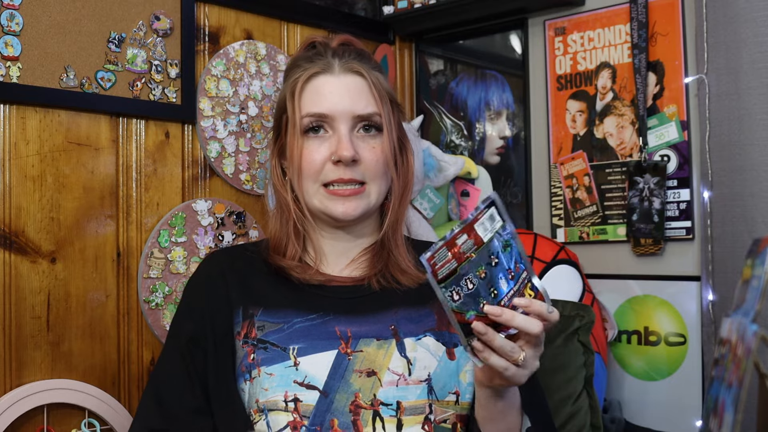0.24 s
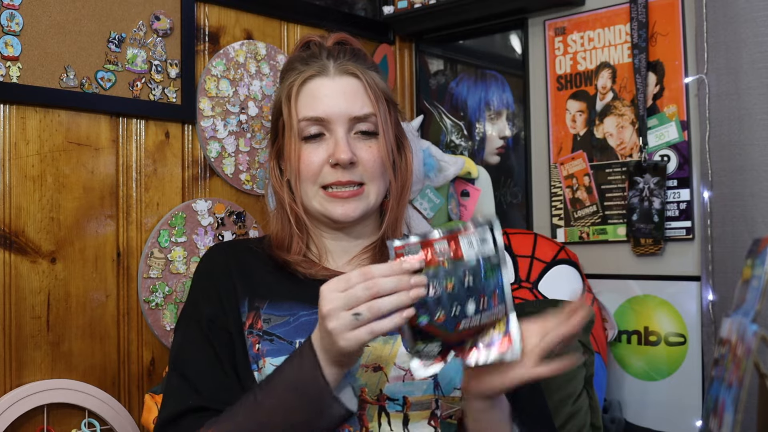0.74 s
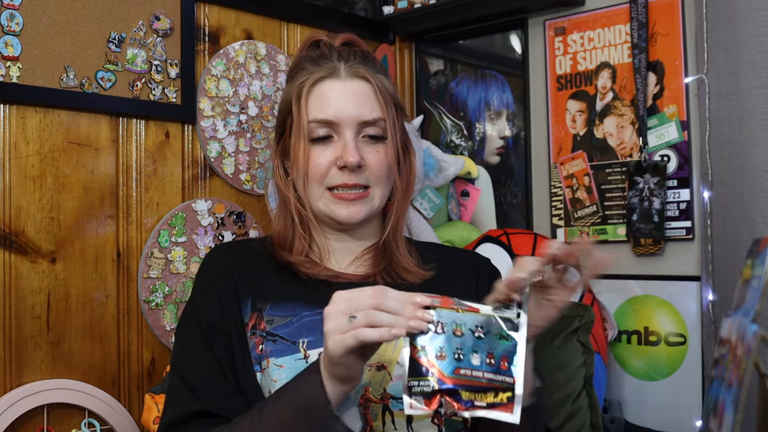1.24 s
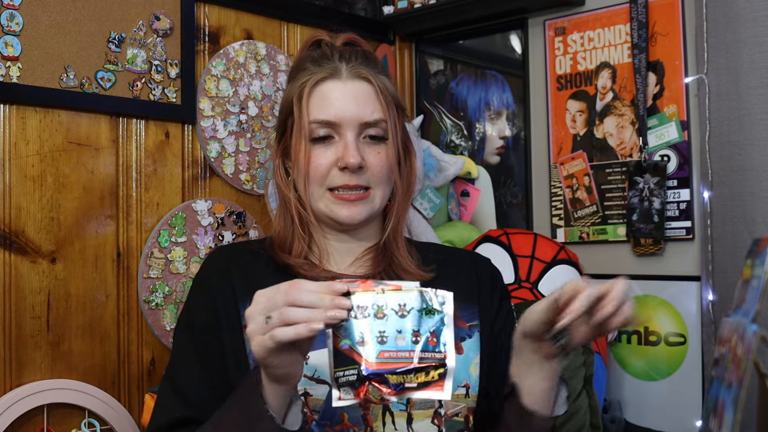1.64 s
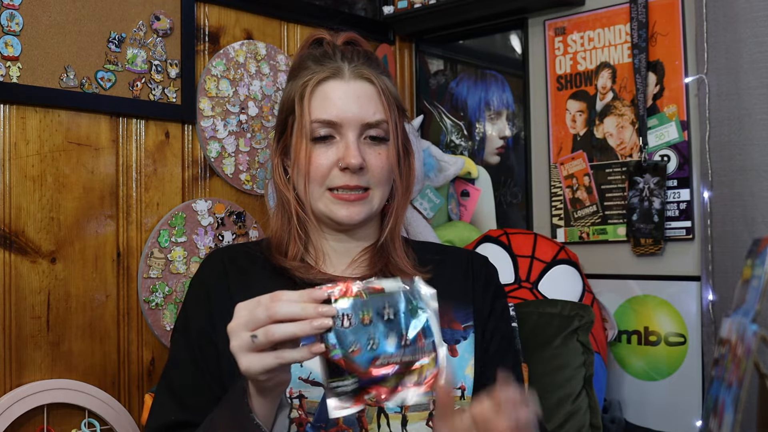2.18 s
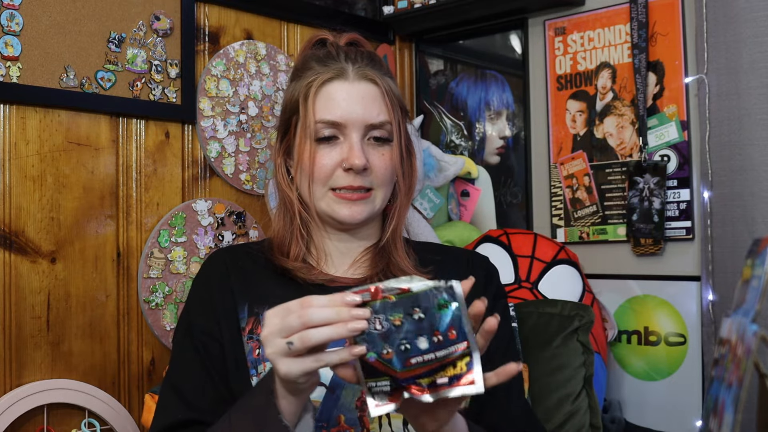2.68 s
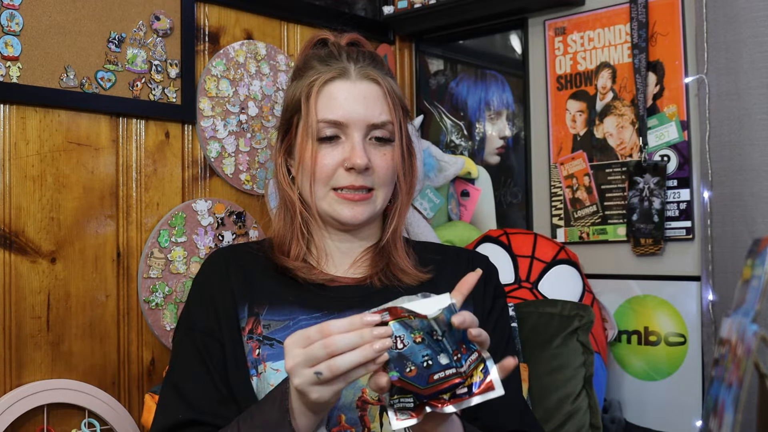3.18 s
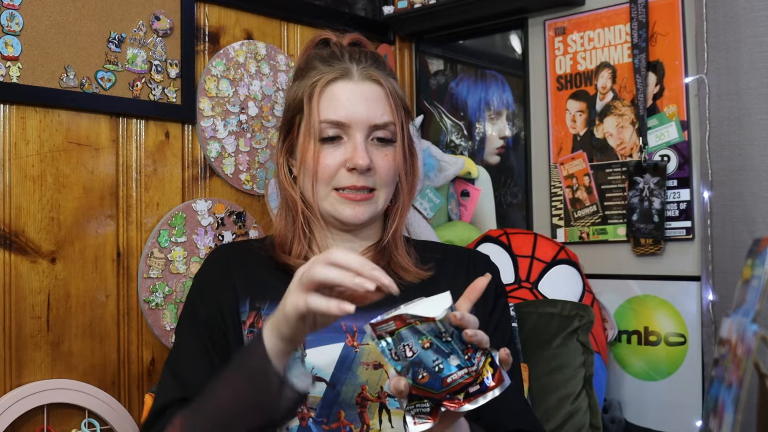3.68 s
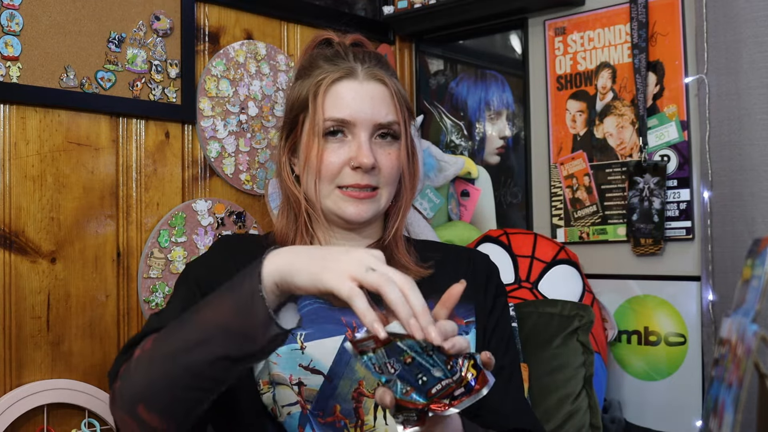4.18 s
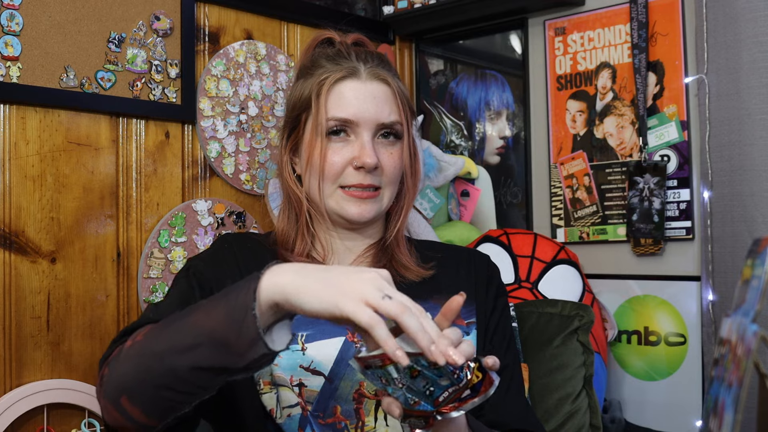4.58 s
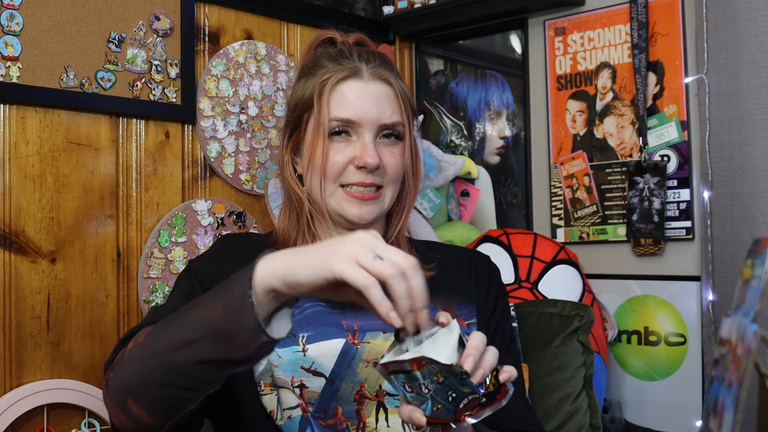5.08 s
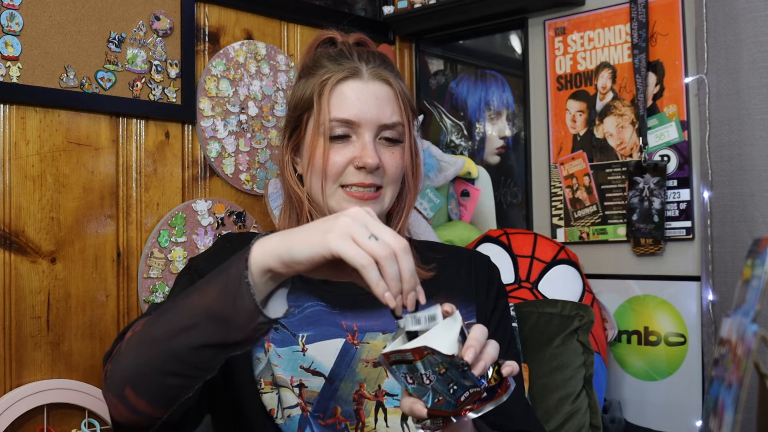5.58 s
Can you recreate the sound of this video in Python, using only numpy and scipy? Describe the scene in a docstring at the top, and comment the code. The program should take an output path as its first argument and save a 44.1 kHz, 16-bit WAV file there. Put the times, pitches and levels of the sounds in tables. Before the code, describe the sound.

A hard object rattles and knocks on a desk, then a stiff foil packet crackles in irregular bursts as fingers pull at it.

```python
"""A small room with a faint hum; a stiff foil packet is turned over and pulled open by hand, close to
the microphone. First something hard rattles to rest and knocks on the desk: modes driven by blows,
with a clatter of dying noise. Then the foil buckles in single snaps and bunches of snaps, short noise
bursts that ring a facet. Squeezes of the fingers bring lesser snaps and a fine crinkling of many tiny
creases; slides are grainy filtered noise, squeaks short rising whistles."""
import sys
import numpy as np
from scipy import signal
from scipy.fft import rfft, irfft
from scipy.io import wavfile

SR = 44100
rng = np.random.default_rng(int(sys.argv[2]) if len(sys.argv) > 2 else 0)


def unload_audio(sound):
    """Save the sound as a 16-bit wav file, at the path given as the first command line argument."""
    columns = np.transpose(np.atleast_2d(sound))
    # keep every value between -1 and 1, then stretch to whole-number steps
    steps = np.round(np.clip(columns, -1, 1) * 32767)
    wavfile.write(sys.argv[1], SR, steps.astype(np.int16))


N = 257103

# Levels in the tables are relative: the functions add their own gains.
# Steady colour of the room tone: (frequency [Hz], spectral level [dB])
ROOM_TONE_COLOUR = [(15, -7), (35, -3), (75, -1), (115, -7), (170, 0.5), (260, -5), (450, -7), (900, -13),
                    (1700, -15), (2500, -21.5), (5000, -22), (9000, -24), (16000, -25.5)]
# Echoes from near surfaces: (delay [s], level [dB])
NEAR_ECHOES = [(.0037, -24), (.0043, -15), (.0052, -17.5), (.0061, -23.5), (.0074, -16.5), (.0089, -17.5),
               (0.011, -30), (0.0278, -20.5)]
# Decay of the small room: (frequency [Hz], t60 [s])
ROOM_T60 = [(200, 0.082), (550, 0.16), (1400, 0.11), (3700, 0.15), (9000, .15), (15000, 0.056)]
# Colour of its reverberation: (frequency [Hz], level [dB])
ROOM_COLOUR = [(200, 3.5), (600, 6), (1500, -1.5), (4000, 0), (8500, 0), (12000, 1), (16000, -2.5)]
# Slow after-ring of the room, colour: (frequency [Hz], level [dB])
LINGER_COLOUR = [(100, -27), (200, 1.5), (450, -5), (750, -10), (1100, -12), (1600, -17), (2500, -22),
                 (6000, -12), (16000, -40)]
# Slow after-ring of the room, decay: (frequency [Hz], t60 [s])
LINGER_T60 = [(200, 0.25), (700, 1), (1600, 1), (4000, 0.4)]

# Modes of the hard object that rattles: (frequency [Hz], level [dB], t60 [s])
OBJECT_MODES = [(214, -3.5, 0.11), (901, -2.5, 0.21), (971, -1, 0.35), (1420, -10, 0.27), (1574, -29, 0.17),
                (1700, -20, .22), (1898, -8, 0.19), (2320, -24, 0.076), (2620, -8, 0.15), (2810, 1, 0.085),
                (3150, -7, 0.088), (3920, -10, 0.079), (4840, -7, 0.072)]
# Modes of the desk: (frequency [Hz], level [dB], t60 [s])
DESK_MODES = [(224, 0.5, 0.27), (252, 0, 0.11), (355.4, -2, 0.29), (404, -3.5, 0.26), (465, -4, 0.46),
              (516, 3.5, 0.12), (675, -1, 0.36), (708, -13, 0.15), (872, 1.5, 0.053), (1270, -27, 0.08),
              (1980, -4, 0.07)]
# Colour of a hard blow: (frequency [Hz], level [dB])
BLOW_COLOUR = [(25, -29), (80, -13), (160, -35), (210, -3), (300, -9), (700, 2), (1200, 2.5), (2100, -5),
               (3200, -10), (5000, -16), (8500, -24.5), (11000, -37), (16000, -49)]
# Decay of a hard blow: (frequency [Hz], t60 [s])
BLOW_T60 = [(200, 0.33), (700, 0.13), (2000, 0.17), (5000, 0.12), (12000, 0.15)]
# Bounces of the object as it rattles to rest: (time [s])
BOUNCES = [.031, .0767, .098, .124, .144, .187]
FIRST_BOUNCE_DB, SETTLE_DB_PER_S = -19, 127  # level of the first bounce, and how fast they weaken
BOUNCE_TILT, BOUNCE_HZ = 1.4, 2900  # dB per octave; pitch of the struck spot
# Knocks on the desk:
# (time [s], level [dB], tilt [dB per octave], pitch of the struck spot [Hz], its boost [dB])
KNOCKS = [(.293, -14.5, 5, 4480, 8), (.349, -16.5, -3.5, 1110, 0), (.3617, -18.5, -1, 2120, 13),
          (.3733, -20.5, -8.5, 720, 9.5), (.418, -31.5, -11.5, 448, 5), (.6059, -22.5, -5, 2830, 6.5),
          (.616, -22, -4.5, 815, 7.5)]

# A fingertip slipping on the foil: (time [s], level [dB], pitch [Hz], length [s])
SQUEAKS = [(1.962, -35.5, 7680, 0.0085), (2.046, -42, 4400, .008), (2.049, -31, 2900, 0.0036),
           (4.56, -40, 6480, 0.012)]
# A finger sliding over the foil: (time [s], length [s], level [dB])
SLIDES = [(0.794, 0.029, -37), (2.511, 0.021, -31), (2.807, 0.028, -48), (3.009, 0.036, -36.5),
          (4.509, 0.031, -44.5), (5.114, 0.035, -32.5), (5.745, .07, -54)]
# Colour of a slide: (frequency [Hz], level [dB])
SLIDE_COLOUR = [(150, -27), (400, 0.5), (1800, 5), (3000, -1.5), (6500, -3.5), (8600, -4), (11000, -15),
                (16000, -20)]
# A squeeze or pull of the fingers: (time [s], length [s], level of the effort [dB])
SQUEEZES = [(0, 0.21, -50), (0.212, 0.18, -57), (0.75, 0.06, -55), (1.192, 0.26, -41), (1.408, .1, -29.5),
            (1.935, .17, -52.5), (2.318, 0.081, -35.5), (2.45, 0.094, -48), (2.793, 0.074, -52.5),
            (3, 0.17, -49.5), (3.184, .35, -40.5), (3.574, 0.22, -47.5), (4.0, 0.69, -58),
            (4.753, 0.092, -45), (4.89, 0.3, -48.5), (5.096, .12, -46), (5.296, .09, -63)]
GRIP_S, LET_GO_S = 0.0083, 0.024  # build-up and dying away of a squeeze
HOLDING_DB = -62  # effort while the foil is only held and stirs faintly
# Colour of the fine crinkling: (frequency [Hz], level [dB])
CRINKLE_COLOUR = [(100, -12), (220, -10), (450, 4), (900, -8), (1800, 6.5), (2700, -0.5), (4500, -2),
                  (6300, -5.5), (8600, -5.5), (11000, -15), (16000, -15)]

# Snaps that stand out: (time [s], level [dB], ring of the facet [Hz],
# sharpness [dB], dull pop below 0 and bright tick above, focus of the sound around the ring [dB])
SNAPS = [(.0028, -16.5, 1500, 1, -2.5), (0.2752, -32.5, 4570, -19, 10), (0.4339, -27, 1340, -24.5, -6),
         (0.4716, -31, 1480, -8, 1), (0.695, -36, 1770, 10, 4), (0.7626, -32, 1930, -14.5, -2),
         (0.8148, -24, 1650, -7.5, -2), (0.85, -30.5, 1670, -17, -8.5), (0.8732, -33, 9130, 4, 3),
         (.9986, -28.5, 1660, -3, -4.5), (1.118, -37.5, 2750, -16, 9), (1.174, -36, 1830, -6, 3),
         (1.194, -32.5, 4590, -5, -3), (1.223, -17, 2300, -2, 1.5), (1.233, -15, 7850, 6, 6),
         (1.2366, -15.5, 1850, 1, 3), (1.2427, -16.5, 1880, 3, 2), (1.3083, -29, 8200, -1, 5),
         (1.3222, -31, 1810, -7, -2), (1.3291, -27, 1940, -2, 1), (1.34, -25, 2960, 3, -5),
         (1.3552, -17, 1970, -7.5, -4), (1.3567, -11.5, 1910, 7, -1), (1.4116, -19.5, 1600, -2.5, -8.5),
         (1.429, -12.5, 8100, 21, 13), (1.444, -11, 5600, 4, -3.5), (1.4707, -11, 8600, 14, -2),
         (1.475, -13, 1820, -12, -2.5), (1.4912, -16.5, 1830, -2, 1), (1.4964, -11, 1890, 3, -3.5),
         (1.5074, -18.5, 1980, -2, -4), (1.516, -20.5, 2470, -1, 3), (1.5258, -21, 3560, 13, 0),
         (1.8094, -34.5, 4300, 5.5, 0), (1.8755, -38.5, 8200, -7, 3), (1.9468, -36, 2000, -17.5, 5.5),
         (1.9866, -29.5, 2180, -5, 1), (2.044, -35, 4420, 9, 0), (2.093, -37.5, 4500, 1, 0),
         (2.1488, -34, 5200, -2, -1), (2.213, -36.5, 8500, 1, 6), (2.3083, -21.5, 1822, -17, 5),
         (2.3131, -18, 1870, -6, -2), (2.3279, -22.5, 1770, 1, -4), (2.341, -20, 1800, -12, -1.5),
         (2.3623, -16.5, 4200, -2.5, 2), (2.3692, -18, 1760, -3, -1.5), (2.415, -24.5, 1700, -9, 3),
         (2.455, -25.5, 1810, -12.5, 1), (2.4784, -26.5, 2110, -13, 3), (2.5237, -14, 1480, -4.5, -1),
         (2.63, -18.5, 5100, 8.5, -0.5), (2.833, -39, 1850, -13, 6), (2.8565, -26, 3250, -1.5, -2),
         (2.879, -35, 7170, 1, 1), (2.91, -38.5, 1840, -8, 5), (2.9445, -36, 2810, -12.5, -1),
         (2.97, -32.5, 1760, -8, 4), (3.0899, -32, 7600, -8, 4.5), (3.1202, -35, 1930, -20, 0),
         (3.1642, -30.5, 1810, -12.5, 3), (3.175, -22.5, 2070, 10, 7), (3.1801, -12.5, 9400, 11.5, 1.5),
         (3.1819, -14.5, 9700, 6.5, 0), (3.1989, -20, 9200, 16, -6), (3.2137, -16.5, 8440, 11.5, -5),
         (3.2473, -20, 7300, 12, -1), (3.321, -15, 7300, 7, 1), (3.355, -15.5, 5040, 3.5, 5),
         (3.3993, -21, 1630, -6.5, 6), (3.4297, -15.5, 8190, 5, -1.5), (3.462, -17, 1940, 11, -1),
         (3.515, -15, 1904, 8, 3.5), (3.5263, -18.5, 4740, 0.5, 12.5), (3.615, -25, 5300, -3, 1.5),
         (3.6276, -28, 1820, 5, 11), (3.6651, -18, 5140, -1, 9), (3.704, -26, 2000, 0, 7),
         (3.7132, -16.5, 1557, 3.5, -3.5), (3.7553, -30.5, 1450, -14, 1), (3.7629, -19, 8140, 17.5, 1.5),
         (3.837, -25, 4870, 3, 0), (3.8463, -7.5, 1510, 5.5, 5), (3.856, -17.5, 1430, -11, 20),
         (3.9694, -34.5, 1760, -10, -2), (4.012, -36.5, 3870, -2.5, -2.5), (4.3392, -34, 1740, -5, -5),
         (4.3762, -17, 6120, 18, -2), (4.5551, -30.5, 8100, -6, 1.5), (4.601, -38.5, 1640, -3, 14),
         (4.6456, -36, 1760, 0, 0), (4.735, -25, 1970, -2, -3), (4.767, -32.5, 1640, -8, -9),
         (4.8056, -27.5, 1450, -4.5, -5.5), (4.8295, -34.5, 5460, 1.5, -2), (4.9664, -23, 1836, 9, 2),
         (4.9711, -19.5, 4200, 9.5, -1.5), (4.9989, -30, 1718, 4, -5), (5.1036, -13.5, 9200, -2.5, 1.5),
         (5.1668, -16.5, 1410, -3, 1.5), (5.204, -15.5, 1810, 0, 3), (5.2829, -24, 1640, -9, -0.5),
         (5.3135, -16, 4970, 0, 3), (5.37, -29.5, 4600, -3.5, 6), (5.43, -47, 1500, -19, -12)]
# Colour common to all snaps: (frequency [Hz], level [dB])
FOIL_COLOUR = [(60, -18.5), (150, -13), (210, -9.5), (370, 1.5), (640, -5.5), (950, -1), (1600, 3),
               (2000, 3), (2500, 1), (3300, 4.5), (4500, 4.5), (6300, 0), (8500, 5), (10800, -3),
               (13500, 2), (16000, -5.5)]
# Further colour of a snap at zero sharpness: (frequency [Hz], level [dB])
SNAP_COLOUR = [(550, 0), (1600, 4), (4000, -0.5), (7000, -1.5), (12500, -9.5)]
# How each band follows the sharpness: (frequency [Hz], change [dB per dB])
SHARPENING = [(550, -1.19), (1600, -0.33), (4000, -0.068), (7000, 0.19), (12500, 0.63)]
# Wide facets ring clearly, small ones less: (frequency [Hz], height of the ring [dB])
FACET_RING = [(1500, 11.5), (3000, 9), (5000, 9), (8500, 7.5)]


def amp(db):
    """Decibels to gain."""
    return 10 ** (np.asarray(db) / 20)


def unit(x):
    """Scales to an rms of one."""
    return x / np.sqrt(np.mean(x ** 2) + 1e-20)


def read(points, hz):
    """Reads a table along a log-frequency axis."""
    f, value = np.transpose(points)
    return np.interp(np.log(hz + 1), np.log(f + 1), value)


def add(mix, s, sound):
    """Mixes a sound in at time s, or at the start if s is negative."""
    part = mix[max(round(s * SR), 0):][:len(sound)]
    part += sound[:len(part)]


def bins(size):
    """Frequencies of a spectrum of that many samples."""
    return np.fft.rfftfreq(size, 1 / SR)


def pulse(db):
    """The shortest causal (minimum-phase) pulse that has this spectrum."""
    log_gain = np.log(amp(np.r_[db, db[-2:0:-1]]))
    return np.fft.ifft(np.exp(np.conj(signal.hilbert(log_gain)))).real


def dying(x, t60s):
    """Lets each band of x die at its own speed."""
    hz, t, z = signal.stft(x, SR, nperseg=128)
    decay = np.exp(-np.log(1000) * t / read(t60s, hz)[:, None])
    return signal.istft(z * decay, SR, nperseg=128)[1][:len(x)]


def even_noise(size):
    """Noise whose spectrum is flat: only the phases are random."""
    return unit(irfft(np.exp(2j * np.pi * rng.random(size // 2 + 1))))


def room_tone(air_db=-53.5, hum_hz=199, hum_width_hz=3, hum_db=-60):
    """Steady low noise, with a hum that wavers because it is a narrow band of noise."""
    hz = bins(N)
    air = irfft(rfft(rng.standard_normal(N)) * amp(read(ROOM_TONE_COLOUR, hz)), N)
    hum_band = 1 / (1 + ((hz - hum_hz) / hum_width_hz) ** 2)
    hum = irfft(rfft(rng.standard_normal(N)) * hum_band, N)
    return amp(air_db) * unit(air) + amp(hum_db) * unit(hum)


def tail(t60s, colour, size):
    """Diffuse reverberation: coloured noise with a decay for each band."""
    noise = dying(rng.standard_normal(size), t60s)
    return signal.fftconvolve(noise, pulse(read(colour, bins(size=1024))))[:size]


def linger(x, wet_db=-31, size=32768):
    """Things in the room ring on faintly after the loud sounds."""
    response = tail(LINGER_T60, LINGER_COLOUR, size)
    return amp(wet_db) * signal.oaconvolve(x, response / np.linalg.norm(response))[:N]


def room(ahead, around=None, wet_db=-4, near_db=3, near_s=0.0026, start_s=0.0022, sway=.04, size=6144):
    """Direct sound and echoes that shift as the hands move; what is sent all around feeds a short tail."""
    t = np.arange(size) / SR
    early_boost = 1 + amp(near_db) * np.exp(-t / near_s)
    fade_in = np.minimum(t / start_s, 1) ** 2
    diffuse = tail(ROOM_T60, ROOM_COLOUR, size) * early_boost * fade_in
    paths = signal.unit_impulse(size)  # the direct sound
    for delay, db in NEAR_ECHOES:
        add(paths, delay * (1 + sway * rng.uniform(-1, 1)), amp([db]))
    sent_around = ahead if around is None else around
    wet = signal.fftconvolve(sent_around, diffuse / np.linalg.norm(diffuse))
    return signal.fftconvolve(ahead, paths) + amp(wet_db) * wet


def ringing(modes, blows, rise_s=0.00071, size=65536):
    """Each blow (s, dB) tops up the energy of the modes, which die at their own speeds."""
    t, kicks, sound = np.arange(size) / SR, np.zeros(size), np.zeros(size)
    for s, db in blows:
        add(kicks, s, amp([db]) ** 2)
    contact = np.exp(-1 / (rise_s * SR))
    kicks = signal.lfilter([1 - contact], [1, -contact], kicks + 1e-20)
    for hz, db, t60 in modes:
        kept = np.exp(-2 * np.log(1000) / (t60 * SR))  # share of the energy left a sample later
        energy = signal.lfilter([1], [1, -kept], kicks)
        sound += amp(db) * np.sqrt(energy) * np.sin(2 * np.pi * (hz * t + rng.random()))
    return sound


def blow(db, tilt, spot_hz, spot_db, crack=1, crack_s=0.0017, spot_width=0.1, size=16384):
    """A hard contact: a crack and a dense clatter, boosted at the pitch of the struck spot."""
    t, hz = np.arange(size) / SR, bins(size=1024)
    clatter = dying(even_noise(size), BLOW_T60) * (1 + crack * np.exp(-t / crack_s))
    colour = read(BLOW_COLOUR, hz) + tilt * np.log2(np.maximum(hz, 500) / 1000)
    colour += spot_db / (1 + (np.log((hz + 1) / spot_hz) / spot_width) ** 2)
    sound = signal.oaconvolve(clatter, pulse(colour))[:size]
    return amp(db) * sound / np.sqrt(np.mean(sound[t < .02] ** 2))  # level over the first 20 ms


def knocks(object_db=-25, desk_db=-10.5):
    """Each knock rings the desk, and faintly the object, in step with its strength."""
    out, hits = np.zeros(N), [(s, db) for s, db, *_ in KNOCKS]
    add(out, 0, amp(object_db) * ringing(OBJECT_MODES, hits) + amp(desk_db) * ringing(DESK_MODES, hits))
    for s, *contact in KNOCKS:
        add(out, s, blow(*contact))
    return out


def rattle(object_db=0, desk_db=-14):
    """Each bounce is weaker than the last; the object rings clearly, the desk faintly."""
    out = np.zeros(N)
    hits = [(s, FIRST_BOUNCE_DB - SETTLE_DB_PER_S * (s - BOUNCES[0])) for s in BOUNCES]
    add(out, 0, amp(object_db) * ringing(OBJECT_MODES, hits) + amp(desk_db) * ringing(DESK_MODES, hits))
    for s, db in hits:
        add(out, s, blow(db, BOUNCE_TILT, BOUNCE_HZ, spot_db=8.5))
    return out


def squeaks(glide=0.016):
    """Fast stick and slip: a short whistle that rises a little."""
    out = np.zeros(N)
    for s, db, hz, length_s in SQUEAKS:
        progress = np.arange(0, 1, 1 / (length_s * SR))
        turns = np.cumsum(hz * (1 + glide * (progress - .5))) / SR
        swell = np.sin(np.pi * np.sqrt(progress))
        add(out, s, room(amp(db) * swell * np.sin(2 * np.pi * turns)))
    return out


def slides(gain_db=-2, grain_db=4):
    """Skin drags over the foil: a brief, grainy swish."""
    t = np.arange(N) / SR
    pressure = np.zeros(N)
    for s, length_s, db in SLIDES:
        pressure += amp(db) * np.sin(np.pi * np.clip((t - s) / length_s, 0, 1))
    friction = rng.standard_normal(N) * amp(grain_db * rng.standard_normal(N))
    swish = signal.oaconvolve(friction, pulse(read(SLIDE_COLOUR, bins(size=1024))))[:N]
    return room(amp(gain_db) * pressure * unit(swish))[:N]


def effort():
    """How hard the fingers work the foil: each squeeze builds up, holds and lets go."""
    t = np.arange(N) / SR
    force = np.full(N, amp(HOLDING_DB))
    for s, length_s, db in SQUEEZES:
        grip = np.clip((t - s) / GRIP_S, 0, 1)
        let_go = np.exp(-np.maximum(t - s - length_s, 0) / LET_GO_S)
        force += amp(db) * grip * let_go
    return force


def buckle(colour_db, ring_hz, ring_db, ring_width, unevenness, run_s=0.00064):
    """A crease runs for about a millisecond or less and rings the facet beside it."""
    hz = bins(size=1024)
    t = np.arange(2 * len(hz) - 2) / SR
    run = rfft(rng.standard_normal(len(t)) * np.exp(-t / run_s))
    run /= (abs(run) + 1e-9) ** (1 - unevenness)  # 0 would flatten the spectrum, 1 leaves it rough
    ring = ring_db / (1 + (np.log((hz + 1) / ring_hz) / ring_width) ** 2)
    sound = np.roll(irfft(run * rfft(pulse(colour_db + ring))), 32)  # short lead-in, in samples
    return sound / np.linalg.norm(sound)


def crinkle(gain_db=-4, per_s=900, spread_db=5, ring_db=11, rub_db=-8, count=16):
    """Many tiny creases give way under the fingers, which also rub softly over the foil."""
    hz, out = bins(size=1024), np.zeros(N)
    colour = read(CRINKLE_COLOUR, hz)
    level = amp(gain_db) * effort()
    happens = rng.random(N) < per_s / SR
    strength = amp(spread_db * np.minimum(rng.exponential(1, N), 3.5))
    clicks = level * unit(happens * strength)
    facet = rng.integers(0, count, N)  # which facet each click rings
    for k, ring_hz in enumerate(np.geomspace(1300, 9500, count)):
        grain = room(buckle(colour, ring_hz, ring_db, ring_width=0.08, unevenness=0.56))
        out += signal.oaconvolve(clicks * (facet == k), grain)[:N]
    rub = signal.oaconvolve(rng.standard_normal(N), pulse(colour))[:N]
    return out + amp(rub_db) * level * unit(rub)


def small_snaps(per_s=22, above_db=7.0, spread_db=2, wide_share=.75, wide_hz=1800, narrow_hz=5000,
                scatter=.13, sharpness_db=-5, vary_db=4, focus_db=3, threshold_db=9, count=300):
    """Lesser buckles come by chance in a squeeze, as strong as it; most ring a wide facet. Rows as SNAPS."""
    place, facet = rng.random((count, 2)).T
    strength, pitch, edge = rng.standard_normal((count, 3)).T
    s = (np.arange(count) + place) / per_s
    force = np.interp(s, np.arange(N) / SR, effort(), right=1e-9)  # no force past the end
    db = 20 * np.log10(force) + above_db + spread_db * strength
    ring_hz = np.where(facet < wide_share, wide_hz, narrow_hz) * np.exp(scatter * pitch)
    rows = np.c_[s, db, ring_hz, sharpness_db + vary_db * edge, np.full(count, focus_db)]
    return list(rows[force > amp(HOLDING_DB + threshold_db)])


def snaps(gain_db=20.0, early_s=.0008, bend_s=0.0016, faint_db=-30, blurred_hz=3000, quick_s=0.00039,
          focus_width=0.59):
    """The buckles: wide facets pop low, sharp creases tick high; each radiates into the room its own way."""
    out, hz = np.zeros(N), bins(size=1024)
    for s, db, ring_hz, sharpness_db, focus_db in SNAPS + small_snaps():
        colour = read(FOIL_COLOUR, hz) + read(SNAP_COLOUR, hz) + sharpness_db * read(SHARPENING, hz)
        colour += focus_db / (1 + (np.log((hz + 1) / ring_hz) / focus_width) ** 4)
        run_s = quick_s + bend_s / (1 + amp(db - faint_db) ** 2)  # weak creases give way more slowly
        ring_db = read(FACET_RING, ring_hz)
        ahead = buckle(colour, ring_hz, ring_db, ring_width=0.098, unevenness=0.7, run_s=run_s)
        # summed over all directions, the ring of a small facet blurs away
        blurred_db = ring_db / (1 + (ring_hz / blurred_hz) ** 4)
        around = buckle(colour, ring_hz, blurred_db, ring_width=0.17, unevenness=0.2, run_s=run_s)
        add(out, s - early_s, amp(db + gain_db) * room(ahead, around))  # early_s makes up for the lead-in
    return out


def scene():
    """The foil near the microphone, the rattle, the knocks and the room tone."""
    sounds = snaps() + crinkle() + slides() + squeaks() + rattle() + knocks()
    return (sounds + linger(sounds) + room_tone())[None]


def record(dry):
    """Peaks beyond full scale are clipped; then a lowpass at 16.1 kHz limits the band."""
    lowpass = signal.firwin(255, 16100, window=("kaiser", 8), fs=SR)
    return signal.oaconvolve(np.clip(dry, -1, 1), lowpass[None], "same")


dry = scene()
out = record(dry)
unload_audio(out)
```